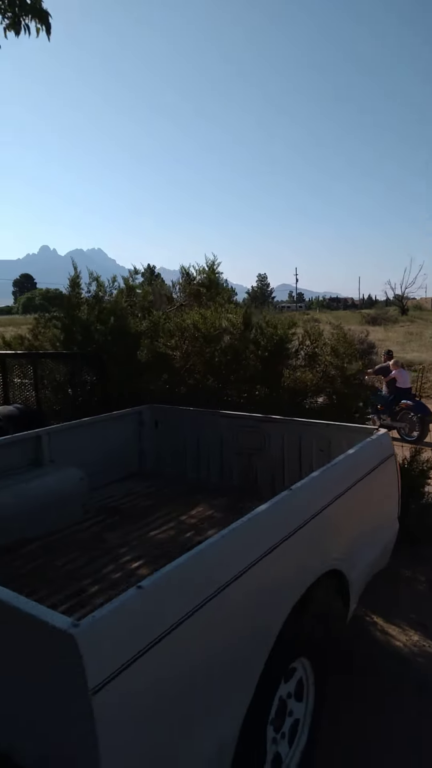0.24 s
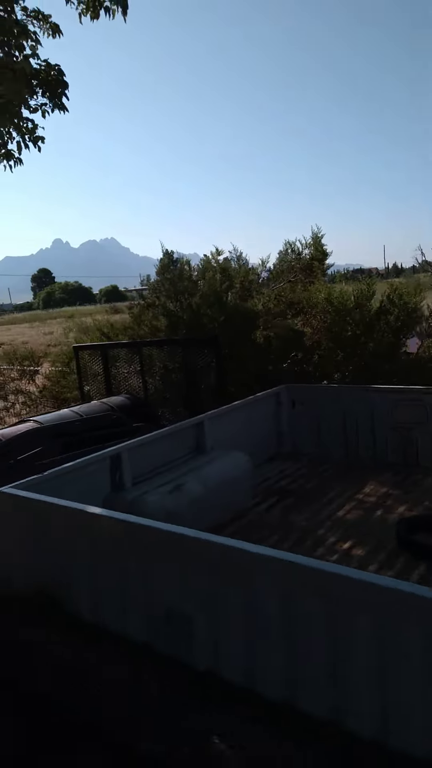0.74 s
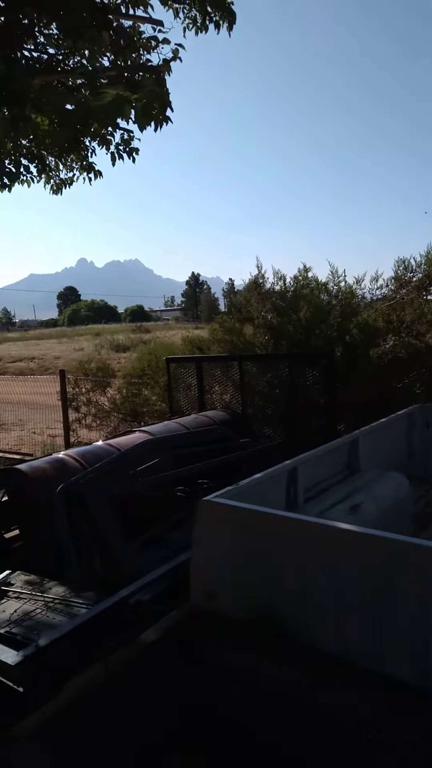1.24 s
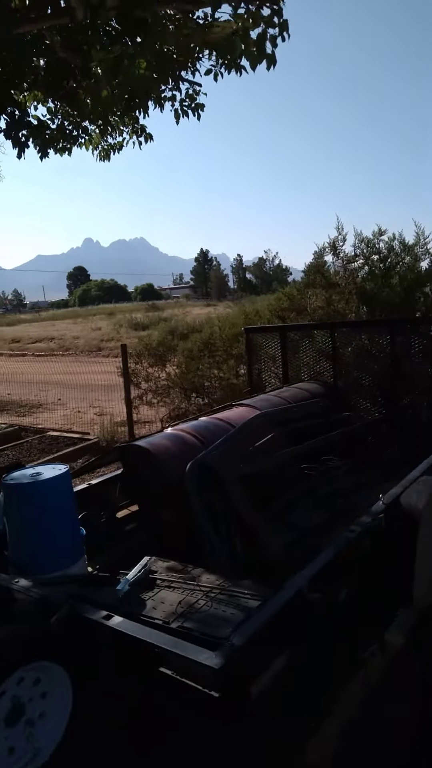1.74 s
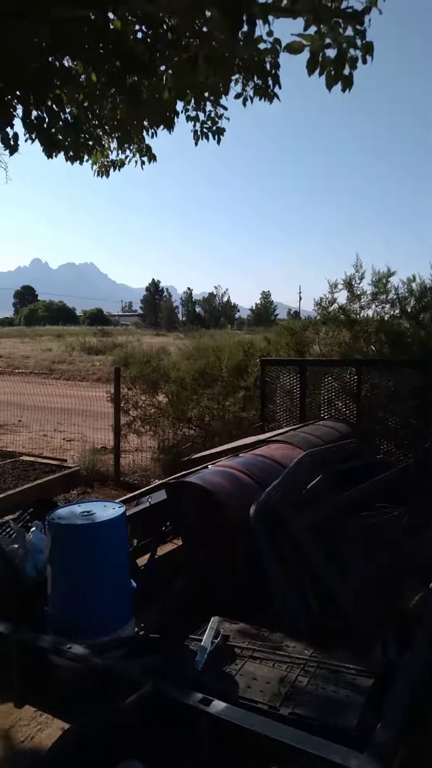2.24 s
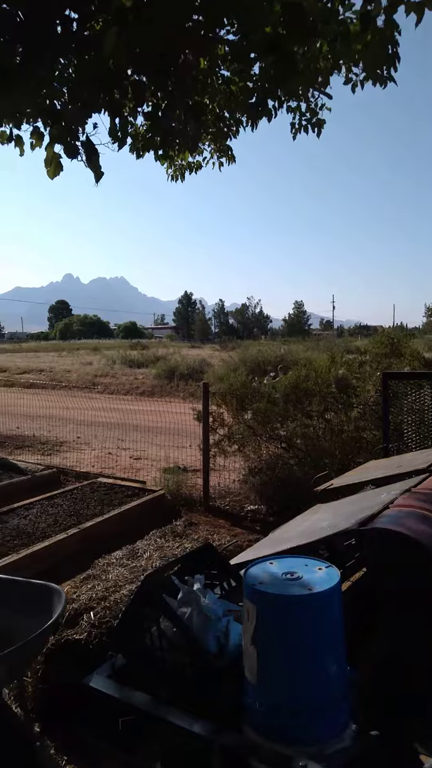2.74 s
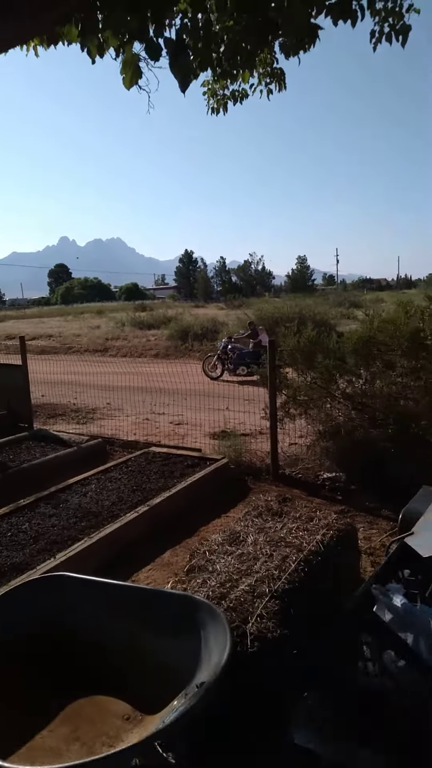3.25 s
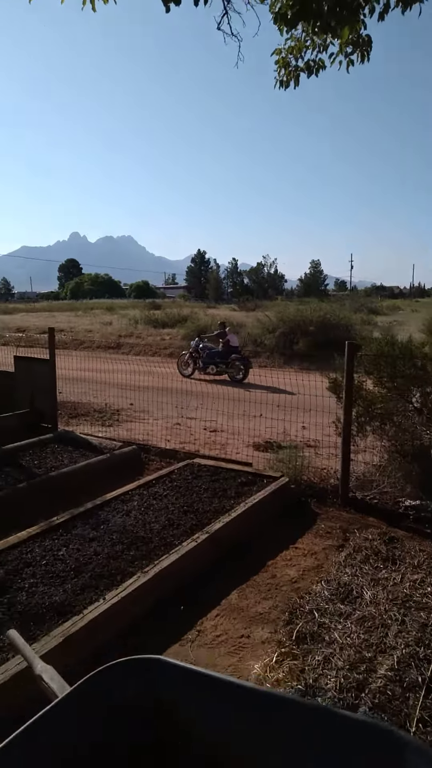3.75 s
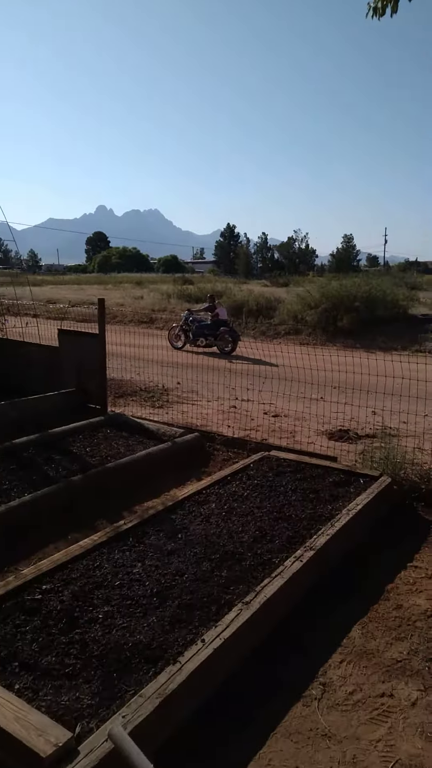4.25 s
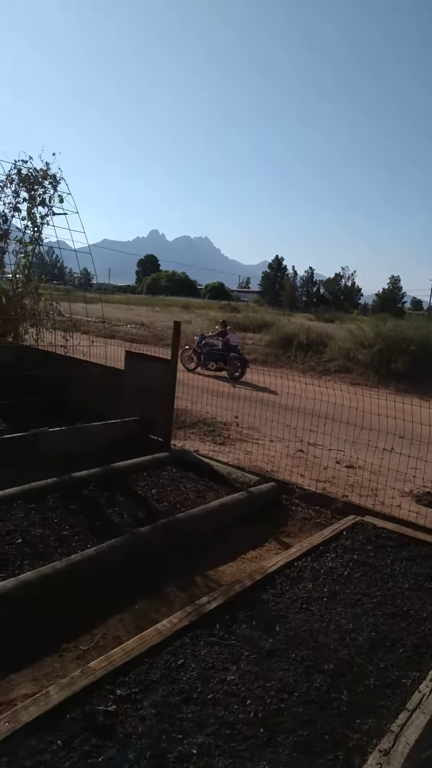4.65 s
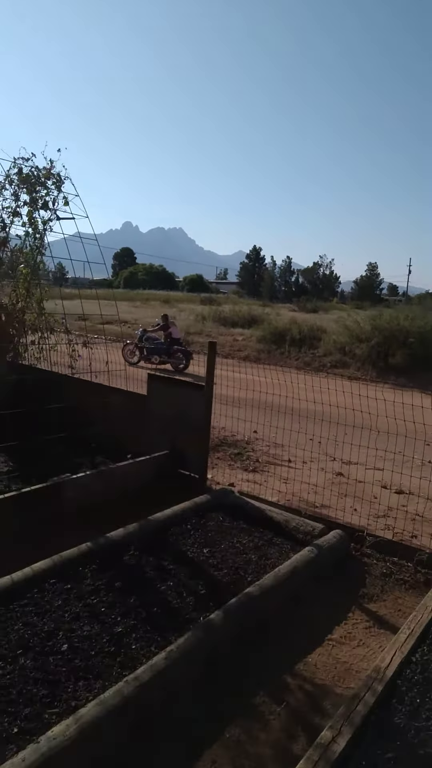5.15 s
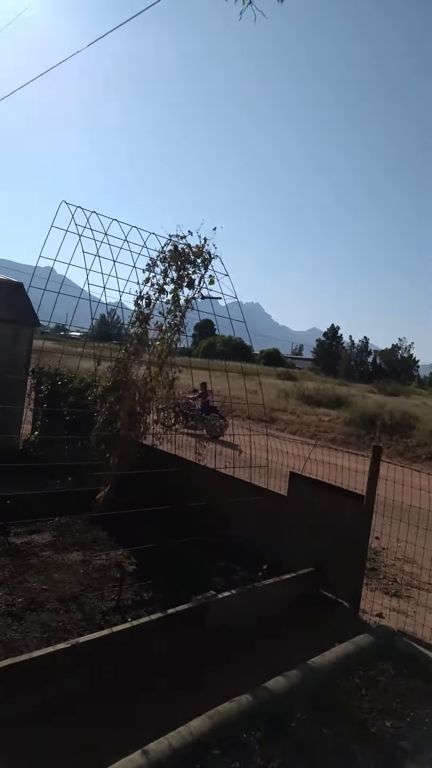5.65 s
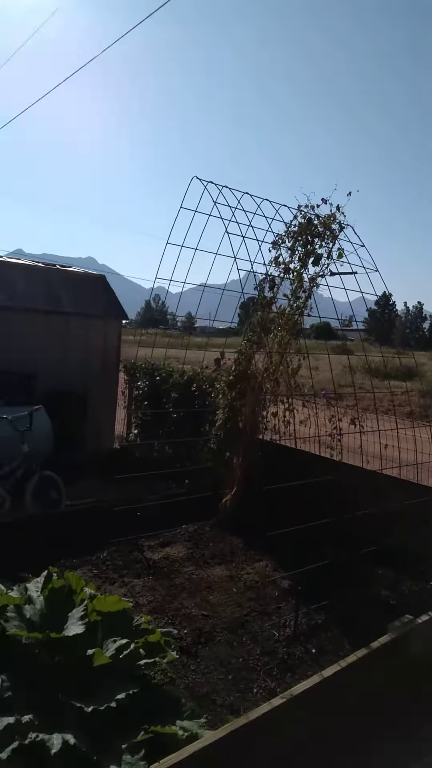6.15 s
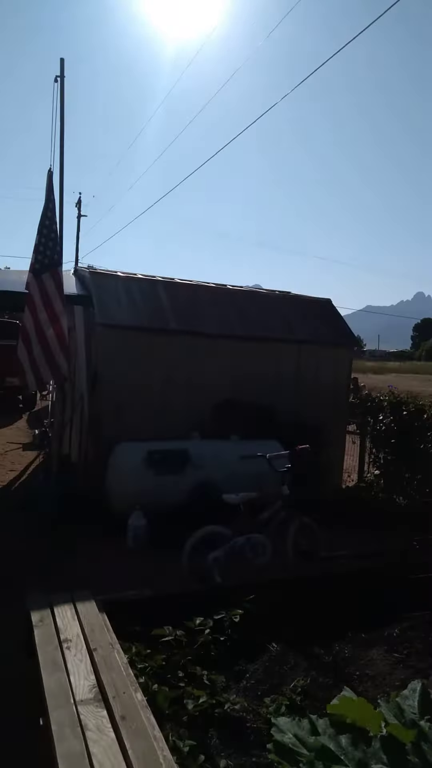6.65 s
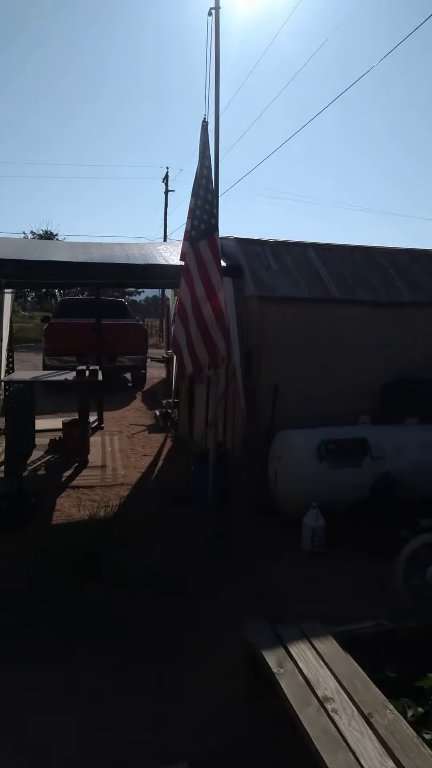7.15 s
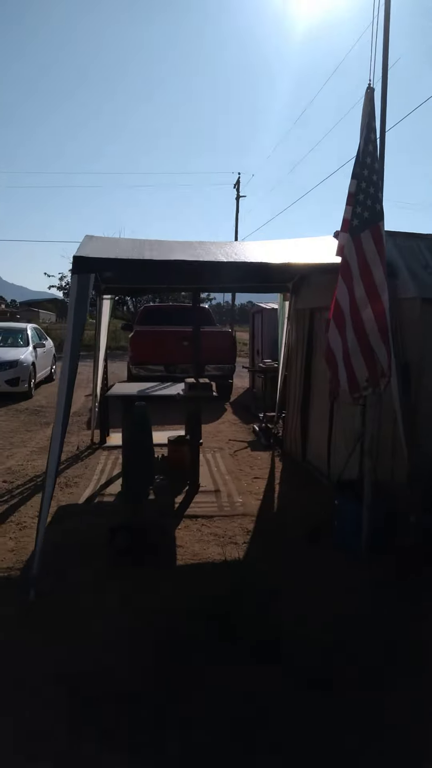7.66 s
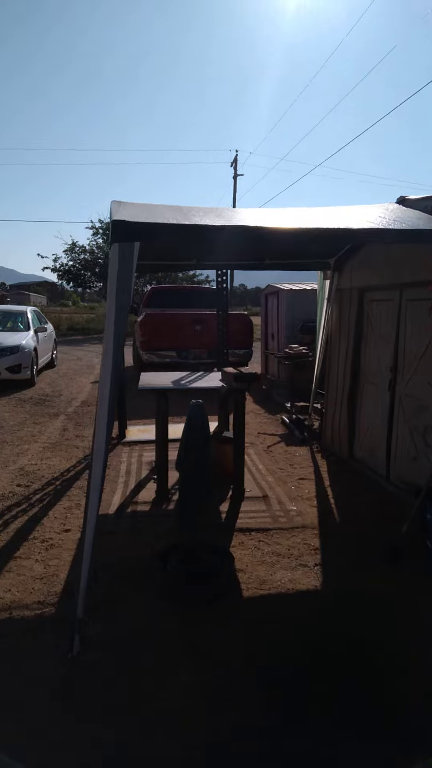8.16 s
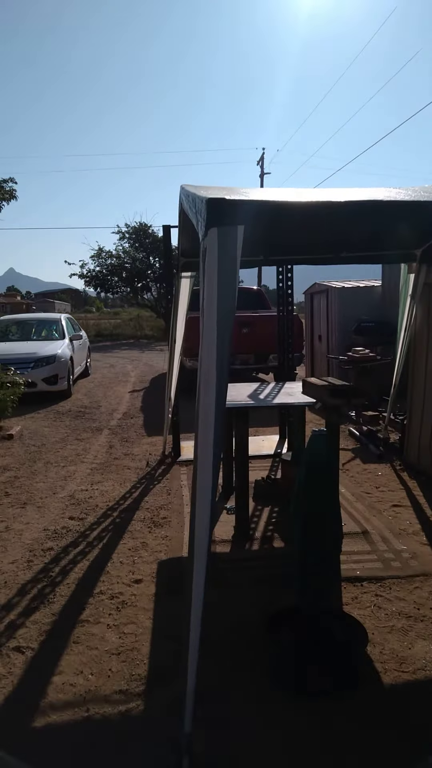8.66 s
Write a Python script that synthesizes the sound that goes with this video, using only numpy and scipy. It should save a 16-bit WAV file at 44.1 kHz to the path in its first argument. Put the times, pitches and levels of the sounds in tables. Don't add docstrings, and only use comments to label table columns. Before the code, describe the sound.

A big two-cylinder motorcycle chugs along a dirt road behind a yard, swells throatily past, then pulls away behind a shed as someone walks on gravel.

```python
import sys
import numpy as np
from scipy import signal
from scipy.io import wavfile

SR = 44100
rng = np.random.default_rng(int(sys.argv[2]) if len(sys.argv) > 2 else 0)


def transcribe(signal):
    frames = np.atleast_2d(signal).T
    limited = np.clip(frames, -1, 1)
    pcm = np.round(limited * 32767).astype(np.int16)
    wavfile.write(sys.argv[1], SR, pcm)


def voltage_ratio(level):
    return 10 ** (np.asarray(level, float) / 20)


N = 392924

# time in seconds, engine cycles per second.
SPEED = [(0.0, 7.31), (0.75, 7.291), (1.41, 8.17), (1.84, 8.319), (2.37, 9.344), (2.84, 9.656),
         (3.82, 9.975), (4.44, 9.057), (4.87, 9.269), (5.29, 8.785), (5.63, 8.949), (6.13, 9.6),
         (6.41, 8.863), (6.61, 8.587), (7.01, 9.008), (8.06, 10.696), (8.53, 11.787), (8.91, 12.272)]
# time in seconds, dB below closest.
NEAR = [(0.0, -7.5), (0.55, -8), (0.82, -12), (1.09, -4), (1.34, -3.5), (2.06, -9.5), (2.5, -3),
        (3.33, -2.5), (4.58, -9.5), (6.11, -6.5), (6.33, -12), (7.01, -16.5), (7.23, -13), (7.64, -0.5),
        (8.21, -3), (8.39, -8.5), (8.73, -7.5), (8.91, -10.5)]
# time in seconds, dB below full.
MIRROR = [(0.0, -15), (0.82, -17), (1.09, -3.5), (1.83, -13), (2.06, -19), (2.92, -1.5), (3.33, -20),
          (3.53, -17), (3.73, -11.5), (3.93, -7), (4.79, -16.5), (5.68, -13), (5.9, -19.5), (6.11, -9.5),
          (6.33, -17.5), (7.07, -21), (7.6, -12.5), (8.45, -16.5), (8.6, -10.5), (8.73, -7), (8.91, -23)]
# time in seconds, dB below full.
LOAD = [(0.0, -15.5), (.5, -15.5), (0.82, -23.5), (1.09, -13), (2.29, -10), (2.5, -1.5), (3.93, -0.5),
        (4.36, -3.5), (4.58, -14), (5.01, -13.5), (5.8, -21.5), (5.97, -14), (6.15, -3.5), (6.33, -4),
        (6.55, -20), (7.01, -22), (7.3, -14.5), (7.44, -11.5), (7.7, -15), (7.87, -22), (8.08, -19.5),
        (8.25, -19.5), (8.5, -13), (8.65, -11), (8.8, -16.5), (8.91, -30)]
# time in seconds, loudest bark mode in Hz, rear minus front cylinder in dB,
# more of that difference in the higher modes in dB.
HEADING = [(0, 312, -3.5, 1), (.4, 315, 3, -6), (1, 302, -1, -3), (2, 275, -2, -5), (2.3, 310, -10.5, 5),
           (2.6, 335, 0, -5), (3.1, 335, 0.5, -7), (3.4, 322, -2, -10.5), (3.75, 315, 1, -9),
           (4.0, 335, -2.5, -8.5), (4.4, 307, 3.5, -14), (4.8, 275, -8, 3), (5.3, 267, 1, -3),
           (5.9, 313, -7.5, 2), (6.11, 335, -3.5, -5), (6.4, 348, -7.5, 3), (7, 308, 4.5, -12.5),
           (7.25, 326, -0.5, -13), (7.4, 349, -7.5, -9), (7.57, 390, -5, -1), (7.75, 376, -7.5, 2),
           (8.0, 390, -7.5, 4), (8.12, 467, -11, 12), (8.3, 375, -9, 9), (8.6, 394, 4.5, -9),
           (8.91, 394, -9, -12)]


def in_time(rows):
    s, *columns = np.transpose(rows)
    return [np.interp(np.arange(N) / SR, s, column) for column in columns]


def at_hz(points, hz):
    point_hz, value = np.transpose(points)
    return np.interp(np.log(hz), np.log(point_hz), value)


def rms_one(x):
    return x / np.sqrt(np.mean(x ** 2) + 1e-20)


def left_right(db):
    return voltage_ratio(db / 2 * np.array([[1], [-1]]))


def filtered(x, order, hz, kind="low"):
    return signal.sosfilt(signal.butter(order, hz, kind, fs=SR, output="sos"), x)


def drift(rate):
    r = np.exp(-80 * np.pi * rate / SR)
    slow = signal.lfilter([1], [1, -2 * r, r * r], rng.standard_normal(N // 40 + 2002))[2000:]
    return np.interp(np.arange(N) / 40, np.arange(len(slow)), rms_one(slow))


def smeared(hz, width_hz):
    turn = 2 * np.pi * np.cumsum(hz * np.ones(N)) / SR
    return drift(width_hz) * np.sin(turn) + drift(width_hz) * np.cos(turn)


def noise_bank(spectrum, shape, alike_more=0.0):
    # frequency in Hz, likeness of left and right from 0 to 1.
    likeness = [(60, 0.98), (150, 0.75), (380, 1), (950, 0.31), (2380, 1), (5980, 0.061), (15000, 0.04)]
    # frequency in Hz, left minus right in dB.
    ports = [(60, 0.0), (99, 3), (160, 9), (270, -23), (450, -7), (740, -2.5), (1220, 1), (2010, 5),
             (3330, 2.5), (5500, 12.5), (9080, -2), (15000, 4)]
    out, white = 0, rng.standard_normal((2, 2, N))
    low_hz, high_hz = spectrum[0][0], min(spectrum[-1][0], .45 * SR)
    edges = np.geomspace(low_hz, high_hz, round(2 * np.log2(high_hz / low_hz)) + 1)
    for k, (low, high) in enumerate(zip(edges, edges[1:])):
        mid, side = filtered(white[k % 2], 2, [low, high], "band")
        hz = np.sqrt(low * high)
        alike = np.clip(at_hz(likeness, hz) + alike_more, 0, 1)
        pair = np.sqrt(1 + alike) * mid + np.sqrt(1 - alike) * side * [[1], [-1]]
        out = out + voltage_ratio(at_hz(spectrum, hz)) * left_right(at_hz(ports, hz)) * shape() * pair
    return rms_one(out)


def swell(s, rise, fall):
    t = np.arange(N) / SR
    return np.exp(-np.abs(t - s) / np.where(t < s, rise, fall))


def dying(clicks, ms):
    return signal.lfilter([1], [1, -np.exp(-1000 / (ms * SR))], clicks + 1e-18)


def hidden_db(spans):
    edge_s = 0.26
    return sum(np.interp(np.arange(N) / SR, [start - edge_s, start, end, end + edge_s], [0, change_db, change_db, 0])
               for start, end, change_db in spans)


def yard(x, wet_db):
    # delay in seconds, level in dB.
    echoes = [(.012, -7), (0.033, 0.5), (0.044, -17), (0.062, -6)]
    out = np.array([x, x])
    for delay, echo_db in echoes:
        for side in (0, 1):
            lag = round(delay * (1 + 0.0079 * side) * SR)
            out[side, lag:] += voltage_ratio(echo_db + wet_db) * x[:-lag]
    return out


def comb(pair):
    # delay in ms, its wander in ms, level in dB.
    detours = [(0.906, 0.11, -3), (2.298, 0.255, -3.5), (3.7, 0.142, -5.5), (6.1, 0.348, -5)]
    out, n = pair.copy(), np.arange(N)
    for ms, wander_ms, level_db in detours:
        late = (ms + wander_ms * drift(0.886)) * SR / 1000
        for side in (0, 1):
            out[side] += voltage_ratio(level_db) * np.interp(n - late * (1 + 0.029 * side), n, pair[side])
    return out


def layer_db(name):
    layers = {"puff": (-47, 0.0, 1.0, 0.0), "hiss": (-51, 0.5, 0.52, -0.23),
              "clatter": (-43.5, 0.47, 0.13, 1.05), "whine": (-48.5, 0.0, 0.24, 1.2),
              "case": (-51, 0.63, 0.0, 0.65), "rasp": (-40, 0.29, 0.5, 0.5)}
    # time in seconds, dB below open.
    sight = [(0.0, -10.5), (.28, -17), (.55, -36.5), (1.8, -18), (2.18, -17), (2.3, -10), (2.92, -1),
             (3.12, -5), (3.9, -2), (4.14, -9.5), (4.4, -2.5), (4.85, -5.5), (5.05, -6), (5.68, -2),
             (6.11, -20.5), (6.4, -13.5), (7.1, -31), (8.91, -37.5)]
    # time in seconds, dB below broadside.
    flank = [(0.0, -12), (.28, -14.5), (.47, -14.5), (.75, -23), (1.09, -15), (1.34, -13.5), (3.12, -4.5),
             (4.58, -4), (5.68, -12.5), (5.9, -1.5), (6.6, 0.5), (7.01, -27), (7.25, -14.5), (7.44, -21.5),
             (8.4, -26.5), (8.73, -14), (8.91, -18)]
    top_db, load_share, sight_share, flank_share = layers[name]
    seen_db = sight_share * in_time(sight)[0] + flank_share * in_time(flank)[0]
    return top_db + load_share * in_time(LOAD)[0] + seen_db


def open_air():
    # frequency in Hz, level in dB per Hz.
    air_spectrum = [(440, -36), (750, 10), (820, 6), (1860, -2), (4170, -42), (9960, -6.5), (15200, -25),
                    (16000, -30)]
    return voltage_ratio(-69) * noise_bank(air_spectrum, lambda: voltage_ratio(2.5 * drift(3.7)))


def sparrows():
    # time in seconds, pitch in Hz, length in seconds, level in dB.
    chirps = [
        (6.837, 5830, 0.063, -62),
        (6.954, 5360, 0.11, -65.5),
        (7.162, 5700, 0.063, -69),
        (7.452, 5925, 0.12, -75),
        (7.597, 5450, 0.11, -73),
        (8.11, 5530, 0.049, -70),
        (8.19, 5600, .05, -77),
        (8.545, 5540, .07, -73),
    ]
    t, blur, out = np.arange(N) / SR, rng.standard_normal((2, N)), 0
    for s, hz, length, level_db in chirps:
        voice = rms_one(filtered(blur, 2, [hz - 350, hz + 350], "band"))
        out = out + voltage_ratio(level_db) * np.exp(-(2 * (t - s) / length) ** 4) * voice
    return out


def footsteps():
    # time in seconds, level in dB, rise in seconds, fall in seconds, left minus right in dB.
    steps = [(0.801, -55.5, 0.097, 0.051, 3.5), (1.237, -52.5, 0.0053, 0.16, 3),
             (1.78, -56.5, 0.016, 0.66, -0.5), (2.236, -47, 0.0029, 0.069, -3),
             (5.74, -48.5, 0.027, 0.059, -2), (6.242, -49.5, 0.028, 0.061, -1),
             (7.234, -59, 0.00065, 0.095, -1), (7.821, -64.5, 0.052, 0.035, 3),
             (7.71, -66, .005, 0.085, -6), (8.17, -63, 0.0086, 0.35, 0), (8.69, -61, 0.07, 0.18, 4)]
    # frequency in Hz, level in dB per Hz.
    scuff = [(290, -55), (500, -30), (880, -0.5), (1030, -8), (1160, -19), (1360, -14), (1640, -6.5),
             (5550, -15.5), (8580, -6.5), (16000, -31)]
    shape = np.zeros((2, N))
    for s, level_db, rise, fall, pan_db in steps:
        shape += voltage_ratio(level_db) * left_right(pan_db) * swell(s, rise, fall)
    return shape * noise_bank(scuff, lambda: voltage_ratio(3.6 * drift(45)), alike_more=-0.54)


def heels():
    # time in seconds, level in dB, rise in seconds, fall in seconds, pitch in Hz.
    heel_falls = [
        (7.236, -58.5, 0.00089, .008, 2110),
        (7.27, -56.5, 0.018, 0.1, 796),
        (7.33, -66, 0.079, .08, 1370),
        (8.27, -65, 0.067, .08, 898),
        (8.68, -60, .03, .06, 1336),
        (8.74, -62, .002, .008, 2170),
    ]
    return sum(voltage_ratio(level_db) * swell(s, rise, fall) * smeared(hz, 120.0)
               for s, level_db, rise, fall, hz in heel_falls)


def pebbles():
    # time in seconds, peak in dB, left minus right in dB.
    snaps = [
        (.917, -52, -3),
        (6.195, -22.5, -8),
        (6.1992, -34, 1),
        (7.236, -50, 4),
        (7.709, -58, 2),
        (8.74, -56, 0),
    ]
    clicks = np.zeros((2, N))
    for s, peak_db, pan_db in snaps:
        clicks[:, [round(s * SR) + 40]] = voltage_ratio(peak_db) * left_right(pan_db)
    out = 0
    for hz, width_hz, level_db in [(3380, 500, 19.2), (10600, 1100, 19.3), (1880, 880, 8)]:
        r = np.exp(-np.pi * width_hz / SR)
        rise = [(1 - r * r) / 2, 0, (r * r - 1) / 2]
        ring = [1, -2 * r * np.cos(2 * np.pi * hz / SR), r * r]
        out = out + voltage_ratio(level_db) * signal.lfilter(rise, ring, clicks + 1e-18)
    return out


def ground_thud():
    return voltage_ratio(-53.5 + 0.6 * in_time(NEAR)[0] + hidden_db([(0.0, 6.8, -5)])) * smeared(48.6, 5.5)


def firings():
    start_cycle = -.52
    rear_fires = .5625
    crank = start_cycle + np.cumsum(in_time(SPEED)[0]) / SR
    turns = np.arange(-1, crank[-1] - 1)
    at = np.searchsorted(crank, np.ravel([turns + rear_fires, turns + 1], "F"))
    earlier = round((-1 - start_cycle) / SPEED[0][1] * SR)
    return np.append(earlier, at), np.arange(len(at) + 1) % 2 == 1


def pops_db(at):
    # time in seconds, change in dB.
    pops = [(.07, 2.5), (.148, 6.5), (.207, 4.5), (.285, 4), (2.446, -3), (2.506, -5), (2.657, 1.5),
            (2.865, -0.5), (2.924, -1), (2.969, 1), (3.073, 0), (3.174, -1), (3.232, -2), (3.277, 2.5),
            (2.762, 1), (2.821, 1.5), (3.027, 1.5), (3.129, 1), (3.334, 4), (3.435, 3.5), (3.482, 4.5),
            (3.537, 6), (3.581, 4), (3.638, 4.5), (3.682, 0.5), (3.739, 1), (3.782, 1), (3.839, -1),
            (3.941, 4.5), (4.148, 1.5), (4.254, -5), (4.362, -3), (4.41, 3), (4.52, 3), (4.582, -3),
            (4.691, -2), (4.739, 5.5), (4.8, 3), (4.847, 6), (4.955, 2), (5.017, -7), (5.128, -7),
            (5.25, -4), (5.29, 1.5), (5.354, 3.5), (5.403, 1.5), (5.516, 3.5), (5.628, 0), (5.69, -2)]
    out = np.zeros(N)
    for s, change_db in pops:
        out[at[np.argmin(np.abs(at - s * SR))]] = change_db
    return out[at]


def burst(at, rear, rear_db, spread_db, crack_ms, tail_ms, tail_db, blunt_db=0, extra_db=0):
    clicks = np.zeros(N)
    clicks[at] = voltage_ratio(spread_db * rng.standard_normal(len(at)) + (rear - .5) * rear_db + extra_db)
    spit = dying(dying(clicks, 0.041), crack_ms)
    return voltage_ratio(blunt_db) * spit / spit.mean() * crack_ms / 50 + voltage_ratio(tail_db) * dying(clicks, tail_ms)


def engine_pumping(at, rear):
    # start in seconds, end in seconds, change in dB.
    gaps = [
        (0.0, .5, 0),
        (2.4, 4.4, 1.5),
        (6.42, 6.65, -5.5),
    ]
    shake = burst(np.minimum(at + 150, N - 1), rear, rear_db=-2.0, spread_db=3.5,
                  crack_ms=9.2, tail_ms=49.0, tail_db=-11.5)
    return 0.69 * voltage_ratio(hidden_db(gaps)) + shake


def valve_clatter(pumping):
    # frequency in Hz, level in dB per Hz.
    clatter_spectrum = [(500, -54), (850, -5), (987, -5), (1140, 2), (1280, -4.5), (1730, -7.5),
                        (1940, -26), (2640, -16), (2800, -23), (3640, -57), (6160, -120)]
    # start in seconds, end in seconds, loss in dB.
    top_dips = [
        (5.9, 6.8, -15),
    ]
    rattle = noise_bank(clatter_spectrum, lambda: voltage_ratio(1.16 * drift(3.0)))
    clatter = rms_one(comb(pumping ** .9 * rattle))
    lower, upper = filtered(clatter, 4, 2150), filtered(clatter, 4, 2150, "high")
    return voltage_ratio(layer_db("clatter")) * (lower + voltage_ratio(hidden_db(top_dips)) * upper)


def gear_whine(pumping):
    # time in seconds, low band in Hz, middle band in Hz, its level in dB, high band in Hz, its level in dB.
    gears = [(0, 940, 1336, -26, 1850, -1), (1.3, 1005, 1545, -2, 1916, -30),
             (1.7, 1002, 1507, -8, 1920, -1), (2.2, 1060, 1550, 0.5, 1935, -11),
             (3.0, 1153, 1630, -12, 2041, -33), (3.8, 1130, 1658, -13, 2080, -9),
             (4.5, 1107, 1580, -14, 1880, -6), (5.1, 1077, 1557, -22, 1916, -9.5),
             (5.8, 1075, 1560, -13, 1952, -7.5), (6.2, 1132, 1596, -18, 2090, -19),
             (6.45, 1095, 1640, -3.5, 2050, -30), (6.65, 1143, 1635, -12, 1980, -38),
             (8.91, 1263, 1703, -16, 2100, -22)]
    # start in seconds, end in seconds, change in dB.
    overtone_fades = [
        (4.2, 5.4, -32),
        (7.0, 8.3, -3),
    ]
    low_hz, middle_hz, middle_db, high_hz, high_db = in_time(gears)
    whine = smeared(low_hz, 38.0) + voltage_ratio(middle_db) * smeared(middle_hz, 63.0)
    whine = whine + voltage_ratio(high_db) * pumping ** .6 * smeared(high_hz, 55)
    whine = whine + voltage_ratio(-8.0 + hidden_db(overtone_fades)) * smeared(1.3 * low_hz, 48)
    return voltage_ratio(layer_db("whine")) * pumping ** .6 * whine


def gear_case(pumping):
    # time in seconds, pitch in Hz, change in dB.
    case_curve = [(0, 761, 1), (.35, 740, 3), (.49, 742, 14.5), (.6, 734.5, 4), (1.9, 654, 13),
                  (2.1, 629, 17), (2.4, 664, 2), (3, 729, -0.5), (6.2, 740, 2.5), (6.5, 735, 4.5),
                  (6.8, 754, 11), (7.1, 734, -1), (7.75, 740, 0), (7.95, 750, -19), (8.15, 760, -3),
                  (8.4, 775.5, 7), (8.6, 764, 9), (8.8, 770, 8), (8.91, 841, 17)]
    # start in seconds, end in seconds, loss in dB.
    trailer = [
        (0.94, 2.0, -17),
    ]
    case_hz, case_db = in_time(case_curve)
    return voltage_ratio(layer_db("case") + hidden_db(trailer)) * voltage_ratio(case_db) * pumping * smeared(case_hz, 57)


def shed_sheet(pumping):
    # start in seconds, end in seconds, gain in dB.
    sheet = [
        (6.25, 6.5, 23),
    ]
    return voltage_ratio(-88 + hidden_db(sheet)) * pumping * smeared(3250, 280)


def puffs_and_tyres(at, rear):
    # frequency in Hz, level in dB per Hz.
    puff_spectrum, hiss_spectrum = [(880, -53), (1500, -15), (2610, -15), (2860, -4), (4000, -8),
                                    (4640, -1.5), (5940, 3.5), (7690, -12), (10900, 3), (16000, -10)], [(1530, -31), (2600, -1), (2830, -2), (3800, -3.5),
                                                  (4560, -5), (8200, -4), (9760, 0.5), (14900, -26),
                                                  (16000, -18)]
    # start in seconds, end in seconds, change in dB.
    blunted = [
        (1.45, 2.2, 2),
        (5.17, 6.3, -3),
        (7.3, 8.0, -4.5),
    ]
    # start in seconds, end in seconds, loss in dB.
    vines = [
        (1.4, 2.15, -1),
        (4.95, 5.65, -6.5),
        (6.9, 7.7, -4),
    ]
    # from Hz, to Hz.
    vines_hz = [2330, 6500]
    blunt_db, extra_db = hidden_db(blunted) + 0.16 * drift(5.9), pops_db(at)

    def spit():
        return burst(at, rear, rear_db=-1.5, blunt_db=blunt_db, extra_db=extra_db, spread_db=2.0,
                     crack_ms=0.95, tail_ms=48.0, tail_db=-21.5)

    puffs = noise_bank(puff_spectrum, spit, alike_more=0.55)
    hiss = noise_bank(hiss_spectrum, lambda: voltage_ratio(2.0 * drift(0.53) + 3.3 * drift(36)))
    bright = comb(voltage_ratio(layer_db("puff")) * puffs + voltage_ratio(layer_db("hiss")) * hiss)
    middle = signal.sosfiltfilt(signal.butter(2, vines_hz, "band", fs=SR, output="sos"), bright)
    return bright + (voltage_ratio(hidden_db(vines)) - 1) * middle


def machine(at, rear):
    pumping = engine_pumping(at, rear)
    metal = valve_clatter(pumping) + gear_whine(pumping) + gear_case(pumping) + shed_sheet(pumping)
    return puffs_and_tyres(at, rear) + metal


def spikes(at):
    clicks = np.zeros(N)
    spike_db = layer_db("puff")[at] + 22 + .5 * pops_db(at) + 2.1 * rng.standard_normal(len(at))
    clicks[at] = -voltage_ratio(spike_db)
    return filtered(clicks + 1e-18, 2, [300, 1500], "band")


def pipe(at, rear, modes, stretch, spread_db, detune, linger, lean=0):
    _, heading_db, more_db = in_time(HEADING)
    rear_db = heading_db + lean * more_db - 0.33 * in_time(MIRROR)[0]
    slowness = (10.2 / in_time(SPEED)[0]) ** linger
    out, t, lead = np.zeros(N + SR), np.arange(SR // 9) / SR, SR // 5
    for cylinder, table in enumerate(modes):
        own = at[rear == cylinder]
        now = np.maximum(own, 0)
        for hz, level_db, ms, start_ms in table:
            chance = rng.standard_normal((len(own), 2))
            age = np.outer(1000 / (ms * slowness[now]), t)
            gains = voltage_ratio(level_db + spread_db * chance[:, 0] + (cylinder - .5) * rear_db[now])
            pitch = hz * stretch[now] * (1 + detune * chance[:, 1])
            rings = age * np.exp(-age) * np.sin(2 * np.pi * np.outer(pitch, t))
            for i, gain, ring in zip(own + lead + round(start_ms * SR / 1000), gains, rings):
                out[i:i + len(t)] += gain * ring
    return rms_one(out[lead:lead + N])


def low_pipes(at, rear, stretch):
    # pitch in Hz, level in dB, swell in ms, start after the firing in ms.
    boom_modes = [
        [(61, -4.7, 9.9, 1.2), (93, 12.3, 17.1, -3.7), (110, -2.0, 26.0, 2.2)],
        [(66, -0.6, 15.3, 5.4), (89, 9.4, 25.3, -2.1), (113, 5.2, 13.6, -3.0)],
    ]
    second_modes = [
        [(154.3, 6, 8.6, -3.5)],
        [(150.4, 9.7, 11.3, -3.5), (138.9, 1.5, 43, -2)],
    ]
    # time in seconds, left minus right in dB.
    turning = [(0, -.2), (1.6, .4), (4, -.3), (6.9, -.3), (7.6, 1.8), (8.2, 1.1), (8.91, .5)]
    boom = pipe(at - round(4.4 * SR / 1000), rear, boom_modes, stretch,
                spread_db=0.23, detune=0.012, linger=1.45)
    second = pipe(at - round(6.3 * SR / 1000), rear, second_modes, stretch ** 0.033,
                  spread_db=1.2, detune=0.018, linger=0.6)
    low = yard(voltage_ratio(-28 + in_time(NEAR)[0]) * boom, -24.5)
    low = low + voltage_ratio(-27 + in_time(MIRROR)[0]) * rms_one(yard(second, -6.5)[0])
    low = filtered(low, 2, 230)
    return low * left_right(in_time(turning)[0])


def rasp(at, rear, stretch):
    # pitch in Hz, level in dB, swell in ms, start after the firing in ms.
    rasp_modes = [(475.5, -3, 13.3, 0.45), (436.7, -6.5, 7.4, 0.31), (555, -6.5, 6.6, 0.65),
                  (612.7, -8, 9.1, 0.77)]
    # start in seconds, end in seconds, change in dB.
    rasp_changes = [
        (0.0, .85, -1.5),
        (2.35, 2.5, -8),
        (5.35, 5.55, -8.5),
        (6.35, 7.3, -19.5),
        (8.03, 8.13, 13.5),
        (8.55, 8.75, 14),
    ]
    late = (np.where(rear, 28, 12.12) * SR / 1000).astype(int)
    rings = pipe(np.minimum(at + late, N - 1), rear, [rasp_modes, rasp_modes[1:]], stretch ** 0.4,
                 spread_db=2.5, detune=0.02, linger=0.55, lean=0.31)
    return voltage_ratio(layer_db("rasp") + hidden_db(rasp_changes)) * rms_one(yard(rings, -9.0))


def bark(at, rear, stretch):
    # pitch in Hz, level in dB, swell in ms, start after the firing in ms.
    bark_modes = [(315, 6, 1.37, -1.21), (224.8, -3.5, 4.9, -5.5), (275, -3.5, 7.6, -3.5),
                  (374.3, -7.5, 11.7, 0.1)]
    # start in seconds, end in seconds, change in dB.
    thinned = [
        (0.0, .8, -6),
        (5.95, 6.45, -5),
        (7.1, 7.85, 1),
        (8.4, 8.91, -2.5),
    ]
    broad = pipe(at, rear, [bark_modes, bark_modes], stretch,
                 spread_db=2.46, detune=0.033, linger=0.15, lean=0.66)
    top_modes = [[(0.96, 0, 4.5, 0), (0.97, -1.1, 5.7, 31.0)], [(0.96, 0, 4.3, 0)]]
    top = pipe(at - round(5.7 * SR / 1000), rear, top_modes, in_time(HEADING)[0],
               spread_db=2.5, detune=0.02, linger=0.48, lean=0.99)
    both = voltage_ratio(hidden_db(thinned)) * broad + voltage_ratio(3.0) * top
    return voltage_ratio(-36 + in_time(LOAD)[0]) * rms_one(yard(both, -6.0))


def truck_echo(at, rear, stretch):
    bounce = (.036, -57, 0.99)
    delay, echo_db, until = bounce
    modes = [[], [(335, 3.0, 6.4, 4.0), (234, 2, 3.9, -2.5), (466, -24.5, 3.8, 3.5), (656, -12, 3.6, 10.0)]]
    echo = pipe(np.minimum(at + round(delay * SR), N - 1), rear, modes, stretch,
                spread_db=1.0, detune=0.028, linger=0.0)
    return voltage_ratio(echo_db + hidden_db([(until, N / SR, -30)])) * echo


def exhaust(at, rear):
    # time in seconds, main boom mode in Hz.
    boom_pitch = [(0, 92.3), (1.1, 89.8), (2.8, 92.4), (6.8, 94.15), (7.25, 96.3), (7.9, 101), (8.2, 100.9),
                  (8.5, 98.6), (8.91, 96)]
    stretch = in_time(boom_pitch)[0] / 92
    high = rasp(at, rear, stretch) + bark(at, rear, stretch) + truck_echo(at, rear, stretch)
    return low_pipes(at, rear, stretch) + filtered(high, 2, 800)


def scene():
    at, rear = firings()
    surroundings = open_air() + sparrows() + footsteps() + heels() + pebbles()
    motorcycle = ground_thud() + machine(at[1:] - 60, rear[1:]) + spikes(at[1:]) + exhaust(at, rear)
    return surroundings + motorcycle


def roll_off(x):
    return signal.sosfilt(signal.butter(12, 16470, fs=SR, output="sos"), x)


def record(dry):
    mix = filtered(dry, 3, 48, "high")
    mix = signal.sosfilt(signal.cheby2(8, 50, 16700, fs=SR, output="sos"), mix)
    return roll_off(mix)


dry = scene()
out = record(dry)
transcribe(out)
```